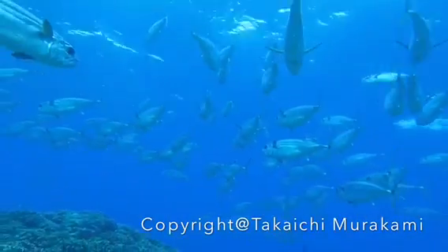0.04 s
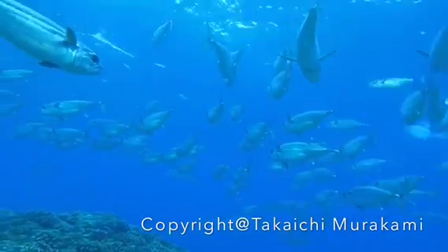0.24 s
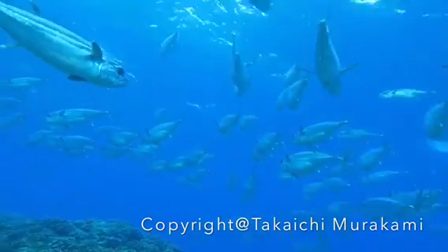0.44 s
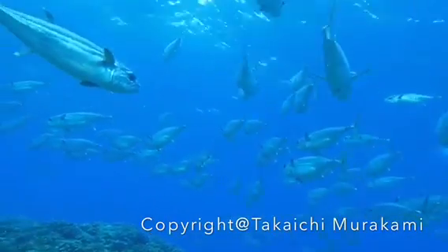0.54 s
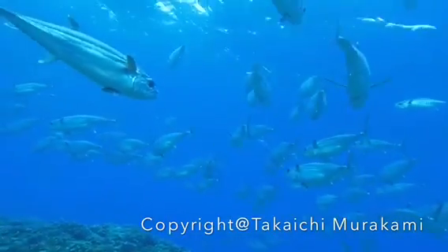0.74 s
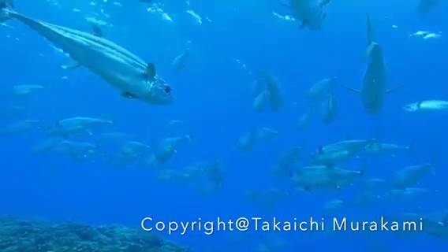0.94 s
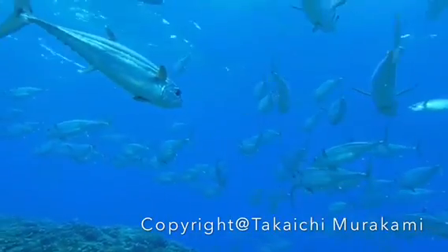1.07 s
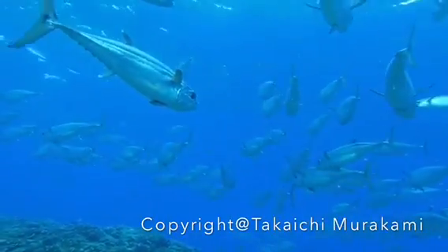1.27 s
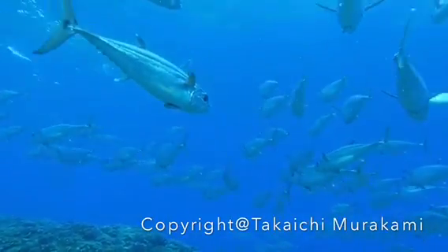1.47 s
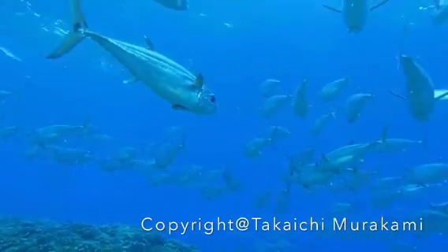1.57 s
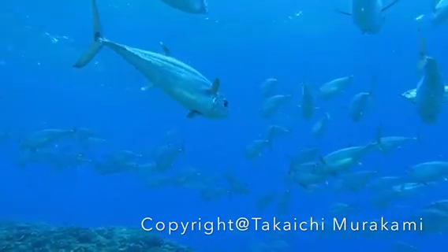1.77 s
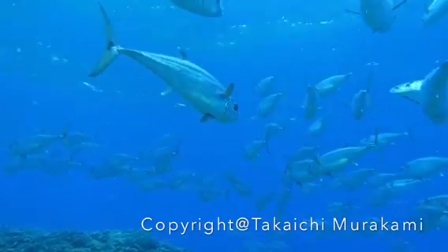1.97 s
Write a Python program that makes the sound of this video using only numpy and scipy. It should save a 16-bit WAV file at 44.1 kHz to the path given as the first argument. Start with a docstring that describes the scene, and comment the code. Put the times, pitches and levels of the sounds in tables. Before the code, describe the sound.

A hard, gritty, hollow knock on an underwater camera housing lands at 0.24 s, very short and far louder than everything else, with a weak follow-up at 0.35. Faint low sea wash and fine shrimp-like crackle run throughout, dipping after the knock and recovering by 1.1. A light tap at 0.94, sharp snap at 1.01, tiny rub at 1.13, then soft clustered taps from 1.59 to 1.95.

```python
"""A low wash and a fine crackle open the scene and run throughout: the open sea inside an underwater camera housing.
The wash is filtered noise; the crackle, likely snapping shrimp, is a random train of resonant noise bursts.
Sharp nearer snaps are single decaying bursts, and soft low bumps of water are sines under bell-shaped envelopes.
Knocks on the handled housing excite its decaying modes with a gritty thud; a rub is a quickening train of slips.
The sea sounds quieter for a while after the hardest knock."""
import sys
import numpy as np
from scipy import signal
from scipy.io import wavfile
from scipy.ndimage import uniform_filter1d

SR = 44100
rng = np.random.default_rng(int(sys.argv[2]) if len(sys.argv) > 2 else 0)


def digitize_waveform(pressure):
    """Quantize a signal to 16-bit integers and store it at the path in sys.argv[1].

    Rows of a 2-D input are taken as channels; values are limited to [-1, 1].
    """
    field = np.atleast_2d(pressure).T
    bounded = np.clip(field, -1, 1)
    quanta = np.round(bounded * 32767).astype(np.int16)
    wavfile.write(sys.argv[1], SR, quanta)


N = 88200

# Spectrum of near and far snaps: f/Hz, relative level/dB
SNAP_SPECTRUM = [(200, 4.5), (600, 2), (1050, 6.5), (1550, 14.5), (2100, 4), (2750, 9), (3450, 7),
                 (4000, -4), (5700, 0), (7800, -7.5), (10700, 1.5), (13300, -9), (16000, -27)]


def amp(db):
    """Level definition: an amplitude ratio is ten to the power of level/20."""
    return 10 ** (np.asarray(db) / 20)


def unit(x):
    """Normalisation: scales a signal to an rms value of 1."""
    return x / np.sqrt(np.mean(x ** 2) + 1e-20)


def read(points, hz):
    """Linear interpolation of a spectrum table along a logarithmic frequency axis."""
    f, value = np.transpose(points)
    return np.interp(np.log(hz + 1), np.log(f + 1), value)


def add(mix, s, sound):
    """Superposition: adds a stereo sound to the mix from time s, cut at the end of the mix."""
    part = mix[:, round(s * SR):][:, :sound.shape[1]]
    part += sound[:, :part.shape[1]]


def colour(x, points, size=2048):
    """Minimum-phase filtering: the Hilbert transform of log gain gives a causal response, here of unit energy."""
    hz = abs(np.fft.fftfreq(2 * size, 1 / SR))
    log_gain = np.log(amp(read(points, hz)))
    taps = np.fft.ifft(np.exp(np.conj(signal.hilbert(log_gain)))).real[:size]
    taps /= np.linalg.norm(taps)
    return signal.fftconvolve(x, taps[None], axes=1)[:, :x.shape[1]]


def lowpass(x, hz):
    """Second-order Butterworth low-pass: attenuation tends to 12 dB per octave above the cut-off."""
    return signal.sosfilt(signal.butter(2, hz, fs=SR, output="sos"), x)


def decay(t, t60):
    """Exponential damping: amplitude falls by 60 dB in each t60."""
    return np.exp(-np.log(1000) * t / t60)


def wall_partials(t, sides, partials_hz):
    """Modal superposition: many faint, equally damped partials of walls and fittings roughen the ring."""
    level_db, t60_s = -20, 0.067
    partials = 0
    for hz in partials_hz:
        cycles = hz * t + rng.random() + sides * rng.random() / 2
        partials = partials + np.sin(2 * np.pi * cycles) / np.sqrt(hz)
    return amp(level_db) * unit(partials) * decay(t, t60_s)


def housing_ring(t, sides, ring_hz, length, low_db, top_db):
    """Damped modal vibration: the grip sets the main mode's pitch, raises the two lowest and damps them all."""
    # Modes of the housing: f/Hz, level/dB, undamped-by-grip t60/s, phase between channels/rad
    modes = [(515.4, -10.5, 0.065, 0.45), (673, -16.5, 0.052, 0.44), (1054, -11, 0.057, 3.25),
             (1428, 0, 0.051, 0.16), (2732, -11, 0.019, 0.86)]
    grip_stiffens = 0.09  # largest fractional rise of the two lowest modes
    main = np.argmax([mode[1] for mode in modes])
    ring = 0
    for k, (hz, mode_db, t60, phase) in enumerate(modes):
        if k < 2:
            hz = hz * (1 + grip_stiffens * (1 - length))
        if k == main:
            hz = ring_hz
        swing = (-1) ** k * np.sin(2 * np.pi * hz * t + sides * phase)
        level_db = mode_db + low_db * (k < 2) + top_db * (k == len(modes) - 1)
        ring = ring + amp(level_db) * decay(t, t60 * length) * swing
    return ring


def contact_force(contact, rise_s):
    """Impulsive excitation: an impulse at contact, with high-passed noise grit that swells and dies around it."""
    grit_db, grit_s, grit_above_hz = 6.5, 0.0023, 640
    time_constant = np.where(contact < rise_s, rise_s, grit_s)
    envelope = np.exp(-abs(contact - rise_s) / time_constant)
    grit = envelope * rng.standard_normal((2, len(contact))) / np.sqrt(grit_s * SR * 2)
    grit = signal.sosfilt(signal.butter(2, grit_above_hz, "high", fs=SR, output="sos"), grit)
    return (contact == 0) + amp(grit_db) * grit


def knocks(size=6000, count=40):
    """Impact excitation: each blow on the housing makes a gritty thud and rings its damped modes."""
    # Blows: t/s, level/dB, main mode f/Hz, ring length as a share of full t60,
    # two lowest modes' offset/dB, top mode's offset/dB, thud offset/dB, thud cut-off f/Hz
    blows = [(0.2405, -4, 1436, 0.85, -4, -6, 2.5, 4360), (0.297, -43, 1520, 0.31, 13, -7, -6, 2500),
             (0.3467, -21.5, 1410, 1.0, 0.5, -6.5, 2, 3400),
             (0.9391, -18.5, 1300, 0.17, -10, -1, -6.5, 2300),
             (1.5873, -22.5, 1494, 0.5, 6.5, -14, -4, 2420), (1.5929, -27, 1497, 0.56, 11.5, 2, -28, 2200),
             (1.7156, -16.5, 1544, 0.53, -3, 12.5, -7, 5100), (1.7217, -26.5, 1563, 0.62, 3, 11, 3.5, 3930),
             (1.8644, -22.5, 1408, 0.64, 3, 4, -5, 4040), (1.8773, -27.5, 1446, 0.41, 3, 3, -4, 3000),
             (1.9445, -23, 1350, 0.34, 7, 4, -37, 2000)]
    # Thud spectrum: f/Hz, relative level/dB
    thud_spectrum = [(30, -9), (120, 2.5), (280, 11.5), (470, 13.5), (700, -4), (1600, 2), (2400, -2.5),
                     (5000, -12), (12300, 6.5), (13500, -0.5)]
    ring_rise_s, thud_base_db = 0.0013, 12.5
    graze_s = 0.004  # each blow grazes the housing just before it lands
    low_hz, high_hz = 300, 2300  # range of the wall partials
    out, sides = np.zeros((2, N)), np.array([[.5], [-.5]])
    contact = (np.arange(size) - round(graze_s * SR)) / SR
    t = np.maximum(contact, 0)
    partials_hz = low_hz + (high_hz - low_hz) * (np.arange(count) + rng.random(count)) / count
    for s, db, ring_hz, length, low_db, top_db, thud_db, cut_hz in blows:
        ring = wall_partials(t, sides, partials_hz)
        ring = ring + housing_ring(t, sides, ring_hz, length, low_db, top_db)
        ring *= 1 - np.exp(-t / ring_rise_s)
        thud = colour(contact_force(contact, ring_rise_s), thud_spectrum)
        thud = lowpass(lowpass(thud, cut_hz), cut_hz)
        add(out, s - graze_s, amp(db) * (ring + amp(thud_base_db + thud_db) * thud))
    return out


def rub(count=24, size=2048):
    """Stick-slip friction: a grip slips ever faster, each slip ringing a little higher or lower as it shifts."""
    # Slip spectrum: f/Hz, relative level/dB
    slip_spectrum = [(40, -5.5), (260, -2), (380, 12.5), (490, -4), (650, 6.5), (850, -8.5), (1400, -4),
                     (2100, -32), (7000, -30), (15000, -65)]
    start_s, end_s = 1.1228, 1.152
    first_per_s, last_per_s, jitter = 165, 340, 0.12  # jitter: spread of the log interval
    level_db, spread_db, detune = -36, 2.5, 0.12  # level at the last slip rate; detune: spread of log pitch
    out, s, taps = np.zeros((2, N)), start_s, np.arange(size)
    slip = colour(signal.unit_impulse(size)[None], slip_spectrum)[0]
    for late, strong, shared_tune, side_tune in rng.standard_normal((count, 4)):
        if s < end_s:
            pitches = np.exp(detune * (shared_tune + np.array([.5, -.5]) * side_tune))
            # Reading the slip faster or slower shifts its pitch
            shifted = np.array([np.interp(taps * pitch, taps, slip, right=0) for pitch in pitches])
            add(out, s, amp(spread_db * strong) * shifted)
        slips_per_s = np.interp(s, [start_s, end_s], [first_per_s, last_per_s])
        s += np.exp(jitter * late) / slips_per_s
    return amp(level_db) * np.sqrt(SR / last_per_s) * out


def bumps():
    """Gaussian wave packets: water nudges the housing in a few low cycles that swell and fade."""
    # Bumps: t/s (centre), f/Hz, peak level/dB, time from peak to 1/e in s
    nudges = [(0.068, 284, -45, 0.012), (0.199, 285, -45, 0.0084), (1.167, 54.7, -44, 0.012),
              (1.219, 78, -38, 0.0033), (1.39, 300, -44, 0.0063), (1.468, 513, -47, 0.014)]
    t = np.arange(N) / SR
    out = np.zeros(N)
    for s, hz, db, length in nudges:
        envelope = np.exp(-((t - s) / length) ** 2)
        out += amp(db) * envelope * np.sin(2 * np.pi * (hz * (t - s) + rng.random()))
    return out


def snap_burst(decay_s, size=1500):
    """Scattering in the housing: a brief noise burst and a faint longer tail, independent in each channel."""
    tail_s, tail_db = 0.0096, -13
    t = np.arange(size) / SR
    envelope = np.exp(-t / decay_s) + amp(tail_db) * np.exp(-t / tail_s)
    return rng.standard_normal((2, size)) * envelope


def snaps(body_hz=4000):
    """Impulsive noise: near snaps share a spectrum, made thin or full by the gain of the band below body_hz."""
    # Near snaps: t/s, level before the common gain/dB, gain of the body/dB
    near_snaps = [(0.0241, -44, 7.5), (0.0606, -43, -9), (0.1301, -42.5, -5), (0.2399, -34, 5),
                  (0.8533, -44.5, -3.5), (1.0112, -31, -8), (1.0764, -41, -3), (1.095, -46, 6),
                  (1.1512, -38.5, -26), (1.172, -41.5, 8), (1.3, -45.5, 5), (1.3191, -43, 3.5),
                  (1.563, -49, 9.5), (1.8642, -49, 11.5), (1.8852, -42, 9), (1.9839, -39.5, -1)]
    decay_s, common_db = 0.0017, 2
    out = np.zeros((2, N))
    for s, db, body_db in near_snaps:
        burst = colour(snap_burst(decay_s), SNAP_SPECTRUM)
        # Filtering forwards and backwards leaves the body in phase with the burst
        body = lowpass(lowpass(burst, body_hz)[:, ::-1], body_hz)[:, ::-1]
        add(out, s, amp(db + common_db) * (burst + (amp(body_db) - 1) * body))
    return out


def crackle(count=24):
    """Shot noise: countless far snaps of random size and pitch, their sizes swelling in clumps."""
    snaps_per_s, size_spread_db = 650, 4.2
    clumps_per_s, clump_db = 60, 2.8
    far_decay_s, peak_q, peak_db = 0.002, 8, 17
    sizes = amp(size_spread_db * np.minimum(rng.exponential(1, N), 4.5))
    sizes *= rng.random(N) < snaps_per_s / SR
    kind = rng.integers(0, count, N)
    clumps = np.interp(np.arange(N) / SR * clumps_per_s, np.arange(N), rng.standard_normal(N))
    sizes *= amp(clump_db * clumps)
    out = np.zeros((2, N))
    for k, hz in enumerate(np.geomspace(1000, 12000, count)):
        grain = snap_burst(far_decay_s)
        resonance = signal.lfilter(*signal.iirpeak(hz, peak_q, fs=SR), grain)
        grain = grain + amp(peak_db) * resonance
        out += signal.oaconvolve((sizes * (kind == k))[None], grain, axes=1)[:, :N]
    return unit(colour(out, SNAP_SPECTRUM))


def wash(level_db):
    """Partially coherent filtered noise: distant sea, coloured by the housing, in drifting patches."""
    # Wash spectrum: f/Hz, relative level/dB
    wash_spectrum = [(25, -8), (290, 2.5), (380, 0), (520, 6), (860, -13), (1030, 5), (1200, -13.5),
                     (1540, 0.5), (1750, -33), (2400, -13), (3900, -19), (7800, -23.5), (13000, -23.5),
                     (16000, -39)]
    # Left-right coherence: f/Hz, coherence (1 alike, negative opposed)
    coherence = [(40, 0.83), (400, 0.61), (950, -0.3), (2400, 0.52), (6000, -0.022)]
    patch_db, flicker_db = 2.5, 1.5
    swirl_below_hz, swirl_follow = 380, 0.5  # the bass swells more than the rest of the wash
    hop = 256
    hz = np.fft.rfftfreq(1024, 1 / SR)
    a, b, c, d, patches = rng.standard_normal((N // hop + 5, len(hz), 5)).T
    patches = uniform_filter1d(patches, size=10, axis=0)  # over frequency
    patches = unit(uniform_filter1d(patches, size=6, axis=1))  # over time
    same = read(coherence, hz)[:, None]
    left, other = a + 1j * b, c + 1j * d
    z = np.array([left, same * left + np.sqrt(1 - same ** 2) * other])
    frames = a.shape[1]
    swell = np.interp(np.arange(frames) * hop, np.arange(N), level_db - level_db.mean())
    swirl = swirl_follow * (hz < swirl_below_hz)[:, None] * swell
    flicker = flicker_db * rng.standard_normal(frames)  # all frequencies together
    z *= amp(read(wash_spectrum, hz)[:, None] + swirl + patch_db * patches + flicker)
    noise = signal.istft(z, nperseg=1024, noverlap=1024 - hop)[1][:, :N]
    return amp(level_db) * unit(noise)


def sea_level():
    """Amplitude modulation: interpolates the levels of the wash and the crackle over time, in dB."""
    # Sea: t/s, wash level/dB, crackle level before the gain in scene()/dB
    sea_points = [(0, -51.5, -60.5), (0.232, -49, -56), (0.29, -58.5, -75.5), (0.38, -57, -65),
                  (0.75, -56, -63.5), (0.98, -52.5, -68), (1.06, -54, -60), (1.15, -46.5, -55),
                  (1.23, -52, -58), (1.47, -47.5, -55), (1.56, -48.5, -56.5), (1.63, -50.5, -60.5),
                  (1.74, -50, -53.5), (1.83, -51.5, -60.5), (1.9, -50.5, -62), (2.0, -49.5, -48.5)]
    s, *levels = np.transpose(sea_points)
    return [np.interp(np.arange(N) / SR, s, db) for db in levels]


def scene():
    """Linear superposition of the sea, its snaps and the handled housing."""
    crackle_gain_db = 1
    wash_db, crackle_db = sea_level()
    sea = wash(wash_db) + amp(crackle_db + crackle_gain_db) * crackle()
    return sea + snaps() + knocks() + rub() + bumps()


def record(dry):
    """Saturation and band limiting: tanh softly compresses the peaks, then a low-pass removes the top."""
    overload, edge_hz = 0.46, 16000  # overload: amplitude that saturation approaches
    pressed = overload * np.tanh(dry / overload)
    taps = signal.firwin(255, edge_hz, window=("kaiser", 9), fs=SR)
    return signal.oaconvolve(pressed, taps[None], "same")


dry = scene()
out = record(dry)
digitize_waveform(out)
```